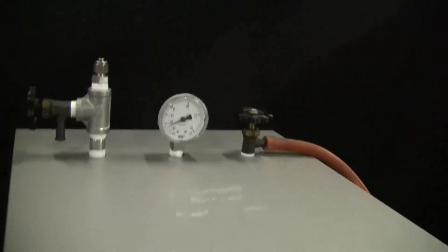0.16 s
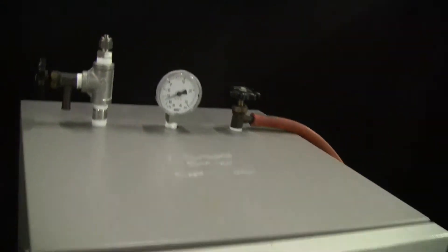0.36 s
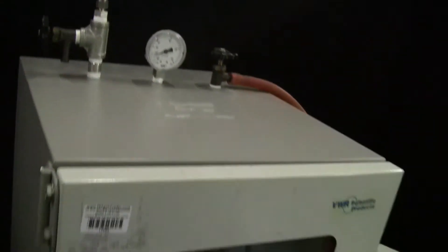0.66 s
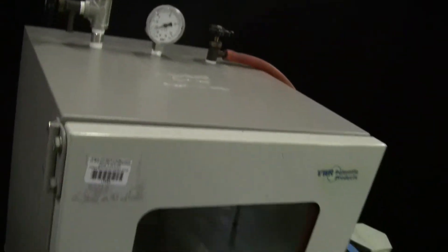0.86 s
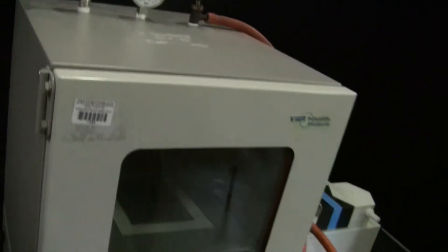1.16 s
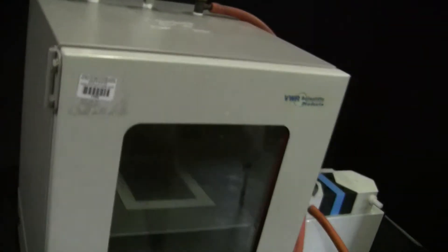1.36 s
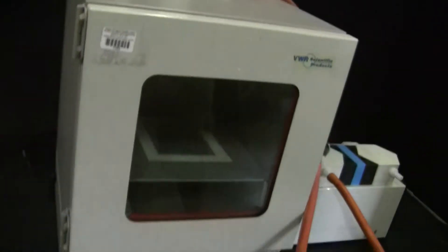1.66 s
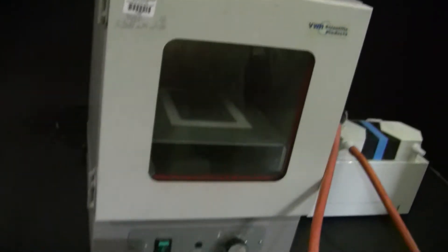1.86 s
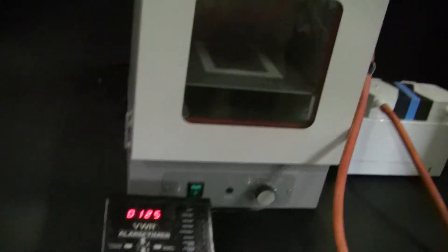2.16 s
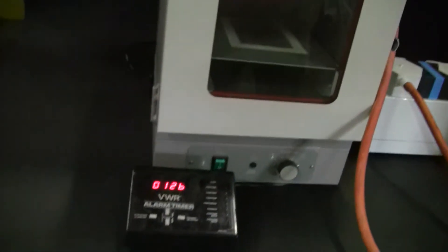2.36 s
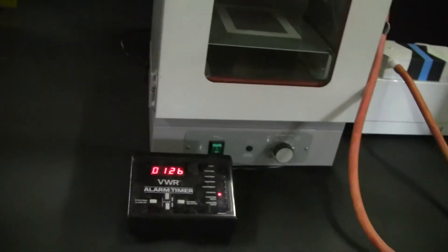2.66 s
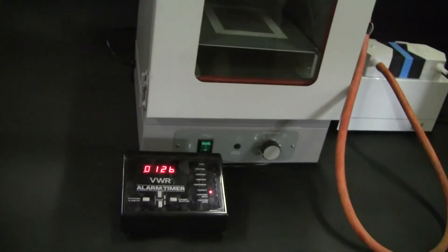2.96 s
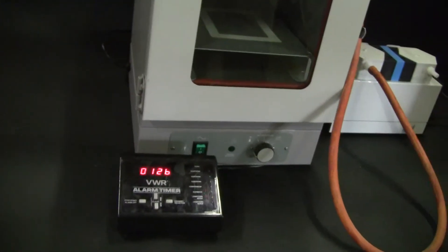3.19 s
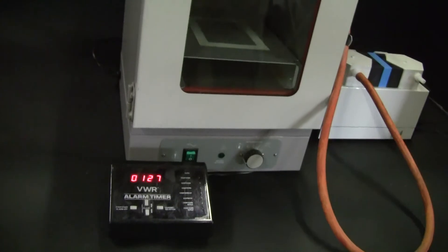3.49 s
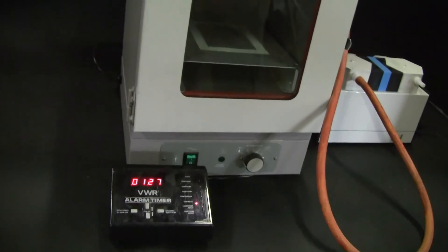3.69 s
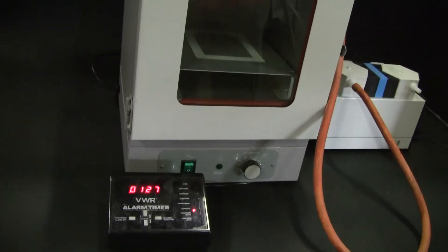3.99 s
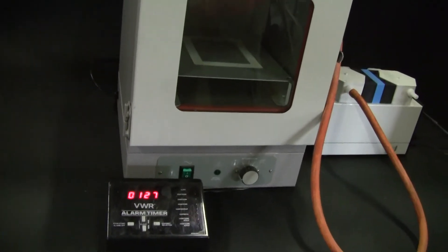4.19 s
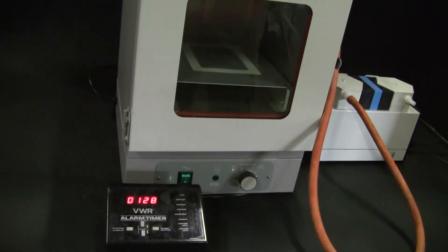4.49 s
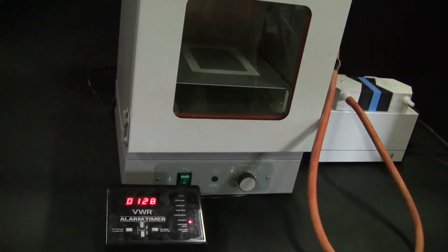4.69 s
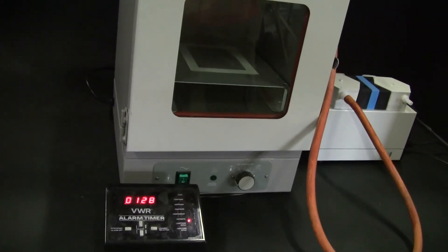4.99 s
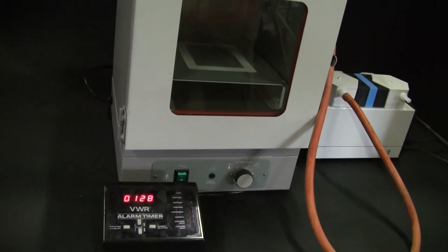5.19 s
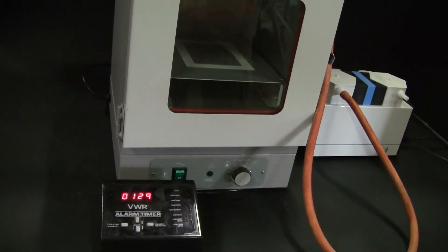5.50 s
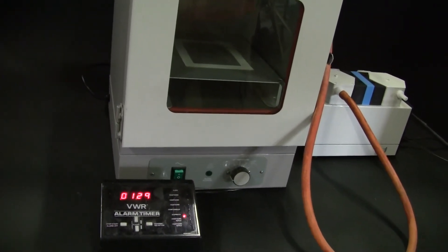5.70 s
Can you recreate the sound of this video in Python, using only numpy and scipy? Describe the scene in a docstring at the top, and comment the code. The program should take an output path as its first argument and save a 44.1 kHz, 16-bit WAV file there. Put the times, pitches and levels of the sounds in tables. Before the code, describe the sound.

Indoors, a small vacuum pump hums and pulses rapidly and evenly throughout, each beat a soft puff with a thin hiss and a light rattle of the casing. Early on there is a brief dry rub, then the drone swells and changes colour as the nearby microphone moves. A small tick and a second faint scuff follow, and the pump keeps running steadily with a slight room echo.

```python
"""In a laboratory, a small diaphragm vacuum pump runs steadily beside a vacuum oven.
Over the hum and the fan, each turn of its shaft sends a puff through the exhaust, a hiss through
the reed valves and a knock through the casing. The listener moves from above the oven to its front,
which changes the colour of the puffs. Something scuffs twice nearby."""
import sys
import numpy as np
from scipy import signal
from scipy.fft import rfft, irfft, next_fast_len
from scipy.io import wavfile
from scipy.ndimage import map_coordinates

SR = 44100
rng = np.random.default_rng(int(sys.argv[2]) if len(sys.argv) > 2 else 0)


def waveform_to_disk(signal):
    """Save audio, clipped to [-1, 1], as 16-bit WAV at the path in sys.argv[1]."""
    frames = np.transpose(np.atleast_2d(signal))
    scaled = np.clip(frames, -1, 1) * 32767
    samples = np.round(scaled).astype(np.int16)
    wavfile.write(sys.argv[1], SR, samples)


N = 257984
TIME = np.arange(N) / SR

# the listener's path: middle/s, length/s
MOVE = (1.9, 1.65)  # from above the oven to its front
CLEAR_TOP = (0.8, 0.83)  # past the edge of the oven top
# places passed on the way: nearest at t/s, half length/s
PUMP_PASS, DOOR_PASS = (1.6, 0.57), (1.34, 0.79)

# bench shaking: multiple of the shaft speed, level above the oven/dB, level in front/dB
BENCH_TONES = [(2, -58, -60.5), (6, -55, -60)]
# mains hum of the motor iron: f/Hz, level/dB
MAINS_TONES = [(120, -51), (240, -56), (360, -53.5)]
# motor fan and room air: f/Hz, relative level/dB
AIR_COLOUR = [(20, -20), (45, -20), (80, -10), (115, -2), (220, 3), (450, 0), (800, 0), (1400, -1),
              (2300, -10.5), (3100, -17), (3650, -13.5), (4300, -18), (6000, -19.5), (10000, -23),
              (13000, -30), (16000, -33)]
# exhaust and cabinet resonances: f/Hz, width/Hz, gain above the oven/dB, gain in front/dB
EXHAUST_MODES = [(132.8, 76, 19, 17), (193.7, 30, 1.5, 16), (251.7, 50, 21.5, 19.5), (298, 52.4, 13, 31),
                 (433.5, 57, 34.5, 20.5), (420.4, 251.7, 35.5, 23), (503, 162.6, 35, 27),
                 (613, 216, 33, 31.5), (675, 188.4, 29, 30), (846, 44, 11, 5), (975, 730, 23, 20),
                 (1218, 840, 17.5, 14.5)]
# air rushing through the valves: f/Hz, relative level/dB
JET_COLOUR = [(500, -34), (1200, -38), (2300, 4.5), (3200, -21), (6000, -6.5), (8000, -0.5), (11000, 9.5),
              (12200, -4), (14000, -10), (16000, -38)]
# ringing of the valve reeds: f/Hz, width/Hz, relative level/dB
REED_MODES = [(3784, 116, -4), (5210, 440, -6), (7070, 134, 4), (7590, 150, 2), (7970, 173, 3.5),
              (9880, 120, 4.5), (11280, 180, 3), (12670, 240, -2.5), (14500, 300, -3.5)]
# ringing of the casing: f/Hz, width/Hz, gain above the oven/dB, gain in front/dB
CASING_MODES = [(1120, 32, 6, -2), (1374, 19, 14, 4.5), (1515, 120, 3.5, 1.5), (1850, 116, -10, -8.5),
                (1966, 22, 4.5, -13), (2313, 180, 2.5, -15.5), (2324, 101, 6.5, 1)]
# time the room's echo takes to fade by 60 dB: f/Hz, t/s
ECHO_FADE = [(200, 0.63), (2000, .22), (12000, 0.22)]
# strength of the echo: f/Hz, gain/dB
ECHO_COLOUR = [(100, -8), (350, -17), (800, -10.5), (1350, -6.5), (1700, -2), (3000, -2), (7000, -16)]
# dry rubs: middle t/s, half length/s, level/dB, treble tilt/(dB per octave)
RUBS = [(0.887, 0.026, -39, -8), (2.543, 0.041, -37.5, -3)]
# rubbing noise before the tilt: f/Hz, relative level/dB
RUB_COLOUR = [(700, -39), (1600, -3.5), (3500, -7.5), (7000, -5), (10000, -4.5), (13000, -12), (16000, -26)]
# light contact that starts the second scuff: t/s, f/Hz, level/dB, time to fade by 60 dB/s
CONTACT_TICKS = [(2.496, 2760, -30, 0.028), (2.497, 3300, -26, 0.0066)]
# how alike left and right are: f/Hz, likeness from 0 to 1
STEREO_LIKENESS = [(60, .97), (300, .98), (1400, .93), (3500, .83), (5500, .6), (8000, .8), (12000, .68),
                   (15000, .65)]
# how much louder the left side is: f/Hz, level/dB
LEFT_LOUDER = [(100, .2), (300, .2), (420, -.3), (560, -1.8), (700, -3), (1200, -.5), (2400, -1.2),
               (5000, -1), (8000, -1.3), (14000, 1)]
# how far the left side is ahead: f/Hz, phase/rad
LEFT_AHEAD = [(100, -.1), (400, -.28), (800, -.14), (3000, -.06), (6000, -.05), (8000, -.5), (10000, -.8),
              (12000, -1.5), (15000, -2)]


def amp(db):
    """Turn decibels into a gain."""
    return 10 ** (np.asarray(db) / 20)


def unit(x):
    """Scale a sound to an average (rms) level of 1."""
    return x / np.sqrt(np.mean(x ** 2) + 1e-20)


def along(points, hz):
    """Read between a table's rows on a log frequency scale."""
    f, values = np.transpose(points)
    return np.interp(np.log(hz + 1), np.log(f + 1), values)


def ease(middle_s, length_s):
    """Glide smoothly from 0 to 1."""
    return .5 + .5 * np.sin(np.pi * np.clip((TIME - middle_s) / length_s, -.5, .5))


def swell(peak_s, half_s):
    """Rise to 1 at peak_s, then fall again."""
    return 1 / (1 + ((TIME - peak_s) / half_s) ** 2)


def heard(above, front):
    """Blend the two listening places as the listener moves."""
    place = ease(*MOVE)
    return (1 - place) * above + place * front


def passing(spot, above_db, front_db, near_db):
    """Gain along the path, changed by near_db while passing a spot."""
    return amp(heard(above_db, front_db) + near_db * swell(*spot))


def filtered(x, response):
    """Shape a sound with a gain and phase for each frequency."""
    size = next_fast_len(N + SR // 2)
    return irfft(rfft(x, size) * response(np.fft.rfftfreq(size, 1 / SR)), size)[..., :N]


def ring(x, hz, width):
    """Pass a sound through one resonance; a narrower one rings longer."""
    return filtered(x, lambda f: 1j * f * width / (hz * hz - f * f + 1j * f * width))


def body(drive, modes):
    """Ring many resonances, alternating in sign, as the moving listener hears them."""
    return heard(*sum((-1) ** k * amp([[above], [front]]) * ring(drive, hz, width)
                      for k, (hz, width, above, front) in enumerate(modes)))


def noise(colour):
    """Stereo noise, less alike left and right in the treble."""
    def shape(f):
        spread = np.arccos(along(STEREO_LIKENESS, f)) / 2
        return amp(along(colour, f)) * [np.cos(spread), np.sin(spread)]
    mid, side = filtered(rng.standard_normal((2, N)), shape)
    return unit(np.array([mid + side, mid - side]))


def kicks(times, scatter_db):
    """Sharp pushes of slightly uneven size, placed between samples."""
    at = times[:, None] * SR
    taps = np.floor(at).astype(int) + np.arange(-7, 9)
    shape = np.sinc(taps - at) * np.cos(np.pi * (taps - at) / 16) ** 2
    size = amp(scatter_db * rng.standard_normal((len(times), 1)))
    return np.bincount(np.clip(taps, 0, N).ravel(), (size * shape).ravel(), N + 1)[:N]


def hum(turns):
    """The shaft shakes the bench and makes the oven cabinet drone; the motor iron hums with the mains."""
    tone = lambda multiple: np.sin(2 * np.pi * multiple * turns)
    bench = sum(amp(heard(above, front)) * tone(k) for k, above, front in BENCH_TONES)
    drone = passing(DOOR_PASS, above_db=-55, front_db=-36.5, near_db=18.5) * tone(multiple=15)
    mains = sum(amp(db) * np.sin(2 * np.pi * hz * TIME) for hz, db in MAINS_TONES)
    return bench + drone + mains


def fan_and_air():
    """The motor fan and the room air make a soft, steady rush."""
    return amp(heard(above=-40, front=-41)) * noise(AIR_COLOUR)


def exhaust(strokes, low_hz=110, soft_hz=1500, gain_db=-1.13):
    """One soft puff a turn; the small outlet gives off little bass."""
    soften = lambda f: (1j * f / (low_hz + 1j * f) / (1 + 1j * f / soft_hz)) ** 2
    puffs = filtered(kicks(strokes, scatter_db=0.18), soften)
    sound = amp(gain_db) * body(puffs, EXHAUST_MODES)
    # in open view, the outlet beams a brighter puff at the listener
    sound += amp(-7) * swell(*PUMP_PASS) * ring(sound, hz=1130, width=250)
    # close over the oven, the bounce off its top weakens one band
    over_top = 1 - ease(*CLEAR_TOP)
    return sound - 0.64 * over_top * ring(sound, hz=825, width=110)


def valves(strokes, delay_s=0.00029, rise_s=0.00075, wander_db=2.57, wander_per_s=3.03):
    """The valves open once a turn: a spurt of air rings the reeds at new strengths each time."""
    latest = np.maximum(np.searchsorted(strokes + delay_s, TIME) - 1, 0)
    age = np.maximum(TIME - strokes[latest] - delay_s, 0)
    spurt = lambda fade_s: (1 - np.exp(-age / rise_s)) * amp(-60 * age / fade_s)
    strength = lambda scatter_db: amp(scatter_db * rng.standard_normal(len(strokes)))[latest]
    jet = noise(JET_COLOUR) * spurt(fade_s=0.025) * strength(scatter_db=0.9)
    flow = noise([(1000, 0), (16000, 0)]) * spurt(fade_s=0.036)  # white noise
    reeds = np.zeros((2, N))
    for hz, width, db in REED_MODES:
        # each reed slowly grows louder and softer by chance
        wander = map_coordinates(rng.standard_normal(256), [TIME * wander_per_s], mode="mirror")
        reeds += amp(db + wander_db * wander) * ring(flow * strength(scatter_db=1.3), hz, width)
    jet_gain = passing(PUMP_PASS, above_db=-35.5, front_db=-38, near_db=-1.5)
    reed_gain = passing(PUMP_PASS, above_db=-45, front_db=-47, near_db=1)
    return jet_gain * jet + reed_gain * unit(reeds)


def casing(strokes, knock_s=0.000905, return_s=.017, gain_db=-0.87, over_top_db=3):
    """Each stroke knocks the casing; the connecting rod rings as it turns back half a turn later."""
    jitter_s = .00003 * rng.standard_normal((len(strokes), 2))
    knock = body(kicks(strokes + knock_s + jitter_s[:, 0], scatter_db=1.5), CASING_MODES)
    rod = ring(kicks(strokes + return_s + jitter_s[:, 1], scatter_db=0.8), hz=2002, width=13)
    rod *= heard(above=amp(7), front=amp(13))
    over_top = 1 - ease(*CLEAR_TOP)  # here the casing is heard most openly
    return amp(gain_db + over_top_db * over_top) * (knock + rod)


def room_echo(sound, count=4):
    """A short echo from bench and walls; its pattern changes until the listener stops."""
    hz, t, hiss = signal.stft(rng.standard_normal((count, 2, SR // 3)), SR, nperseg=256)
    fade = amp(-60 * t / along(ECHO_FADE, hz)[:, None])
    tails = signal.istft(hiss * fade, SR, nperseg=256)[1]
    stop_s = MOVE[0] + MOVE[1] / 2
    path = (count - 1) * np.clip(TIME / stop_s, 0, 1)
    echo = np.zeros((2, N))
    for k, tail in enumerate(tails):
        share = np.cos(np.pi / 2 * np.clip(path - k, -1, 1))
        echo += share * signal.fftconvolve(sound[None], tail / np.linalg.norm(tail[0]), axes=1)[:, :N]
    width = lambda f: np.sqrt(1 - along(STEREO_LIKENESS, f))
    mid, side = filtered(echo, lambda f: amp(along(ECHO_COLOUR, f)) * [np.ones_like(f), width(f)])
    return np.array([mid + side, mid - side])


def scuffs():
    """Two brief dry rubs swell and fade; the second starts with a small tick."""
    rub = noise(RUB_COLOUR)
    sound = np.zeros((2, N))
    for middle_s, half_s, db, tilt_db in RUBS:
        dulled = unit(filtered(rub, lambda f: amp(tilt_db * np.log2(np.maximum(f, 1000) / 1000))))
        sound += amp(db) * dulled / (1 + ((TIME - middle_s) / half_s) ** 4)
    for start_s, hz, db, fade_s in CONTACT_TICKS:
        age = np.maximum(TIME - start_s, 0)
        sound += amp(db - 60 * age / fade_s) * np.sin(2 * np.pi * hz * age)
    return sound


def scene(shaft_hz=28.4055, creep_hz_per_s=.00548, first_stroke_s=.00076):
    """The shaft, speeding up very slightly, times every part of the pump."""
    turns = np.cumsum(shaft_hz + creep_hz_per_s * TIME) / SR
    strokes = first_stroke_s + np.interp(np.arange(int(turns[-1]) + 1), turns, TIME)
    pump = exhaust(strokes) + casing(strokes) + valves(strokes)
    return hum(turns) + fan_and_air() + pump + room_echo(pump.mean(0)) + scuffs()


def record(dry, top_hz=15900):
    """Two close microphone openings differ a little in level and phase; the highest treble is cut."""
    half = np.array([[.5], [-.5]])
    sides = lambda f: amp(half * along(LEFT_LOUDER, f)) * np.exp(1j * half * along(LEFT_AHEAD, f))
    return filtered(dry, lambda f: sides(f) * (f < top_hz))


dry = scene()
out = record(dry)
waveform_to_disk(out)
```